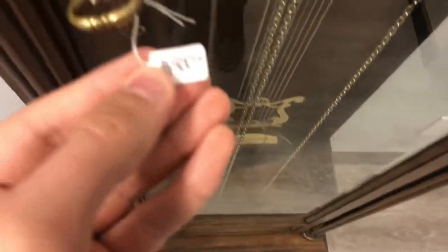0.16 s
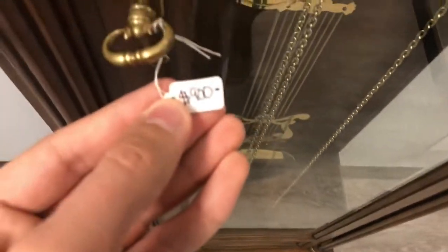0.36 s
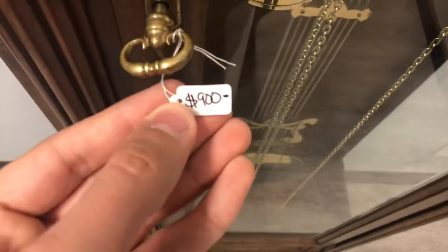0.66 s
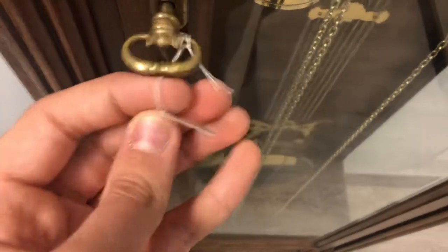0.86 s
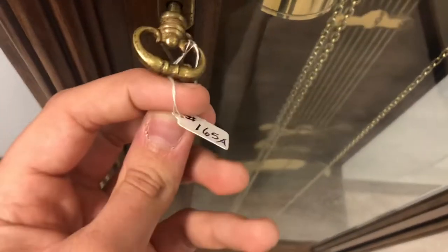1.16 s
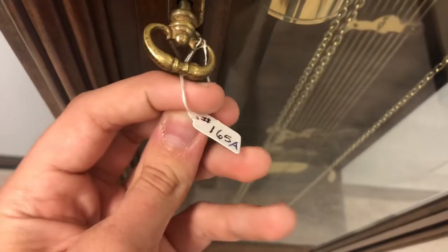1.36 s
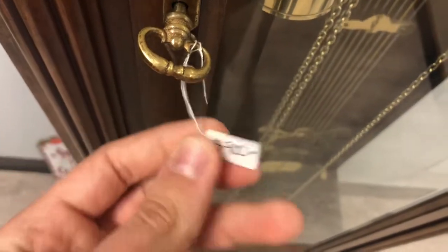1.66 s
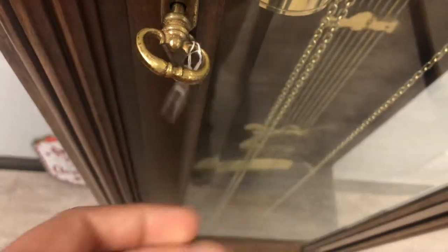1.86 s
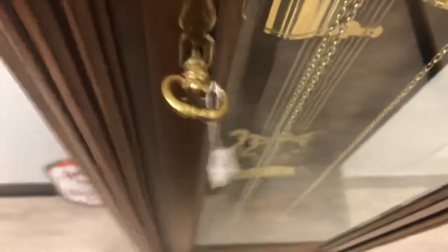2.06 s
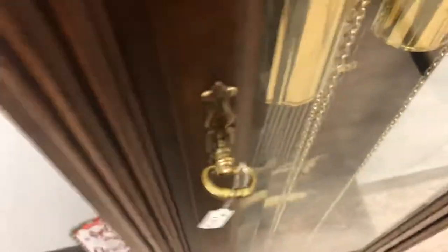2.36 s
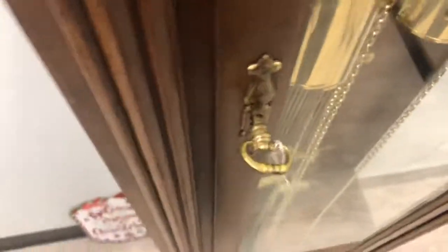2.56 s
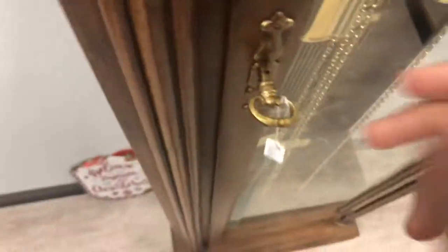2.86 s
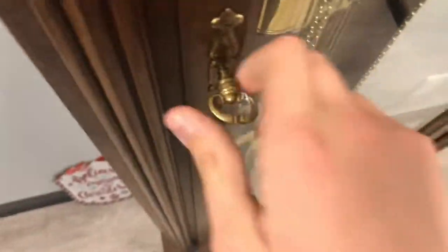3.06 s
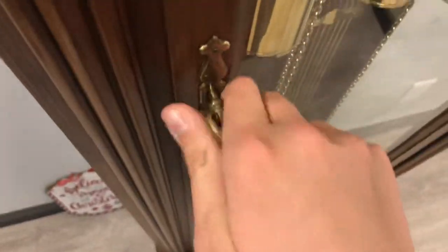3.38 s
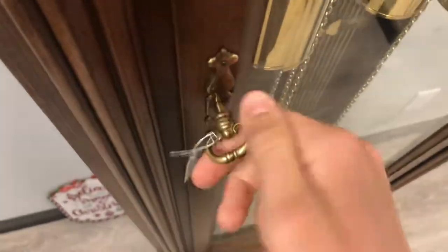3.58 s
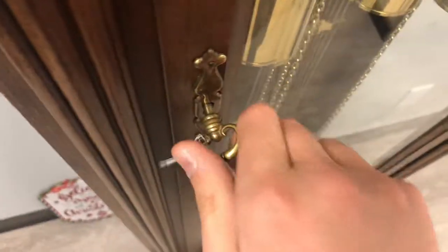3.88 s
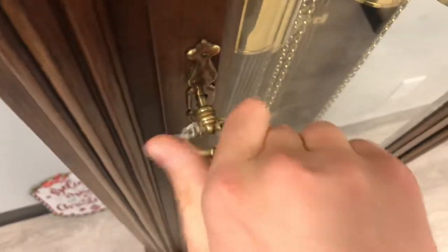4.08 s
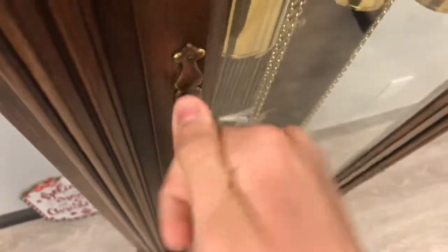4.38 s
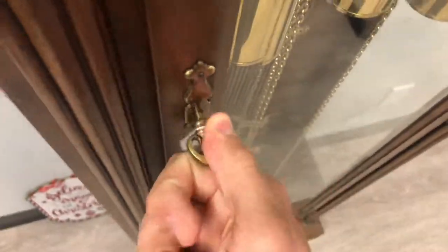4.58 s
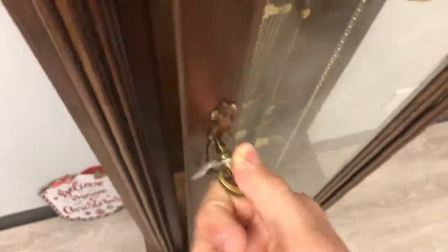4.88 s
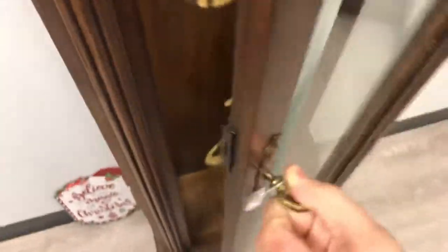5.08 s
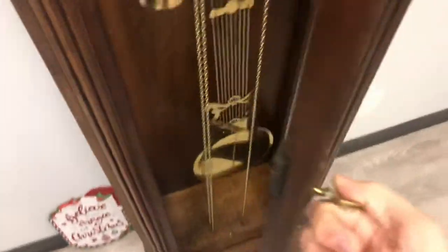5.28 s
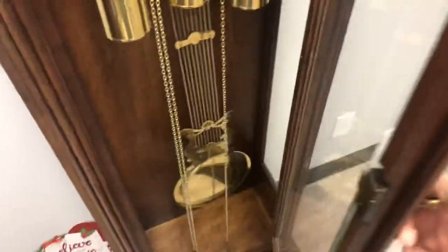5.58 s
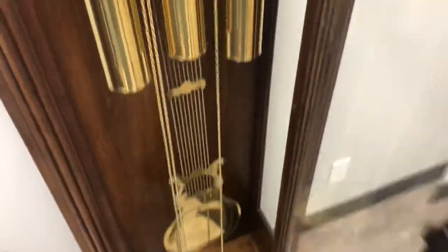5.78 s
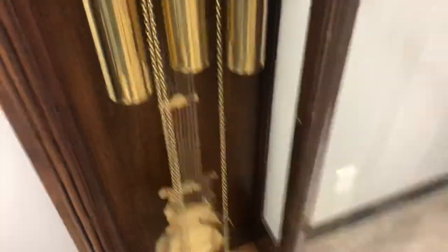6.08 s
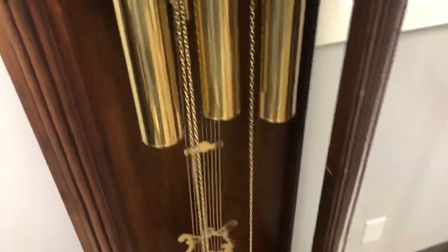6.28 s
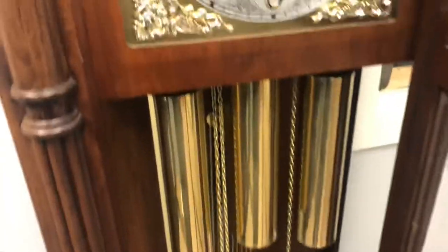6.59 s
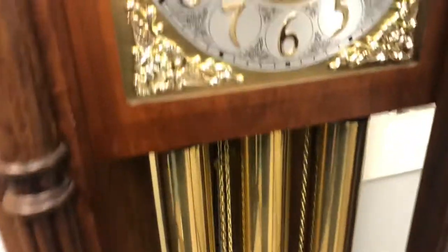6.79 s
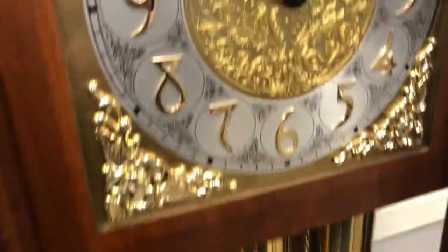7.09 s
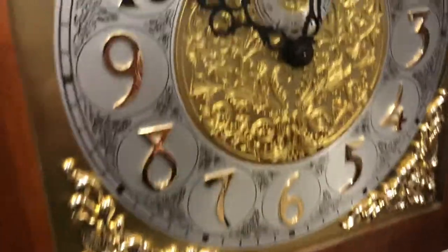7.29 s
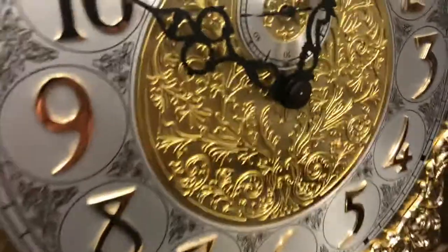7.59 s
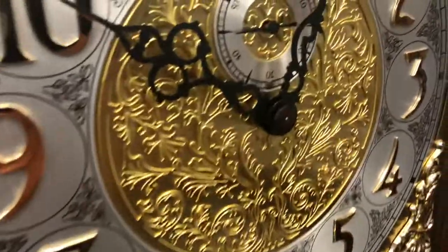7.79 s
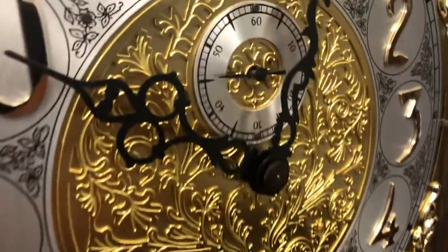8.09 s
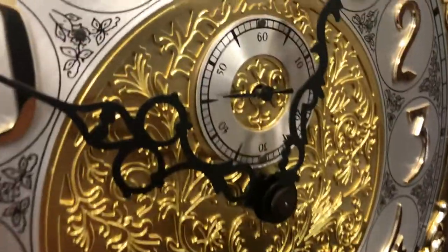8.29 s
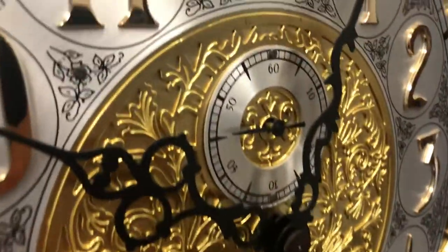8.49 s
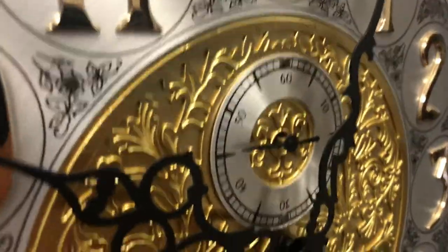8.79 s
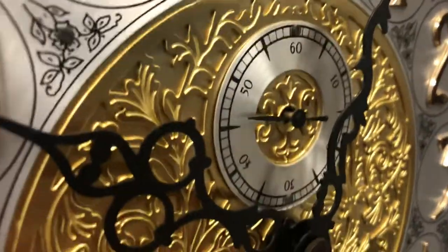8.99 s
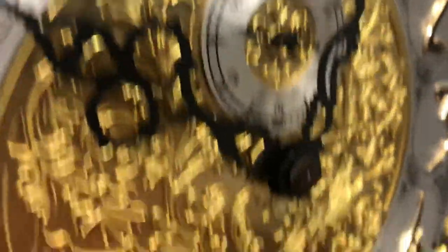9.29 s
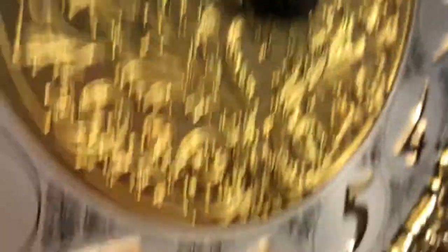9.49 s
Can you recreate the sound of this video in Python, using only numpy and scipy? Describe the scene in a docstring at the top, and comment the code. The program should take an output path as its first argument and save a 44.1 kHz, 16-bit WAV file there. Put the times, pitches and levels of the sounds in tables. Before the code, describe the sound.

Slow, slightly uneven tick-tock in a bare, mildly reverberant room with faint air noise. Near the microphone, fingers rub string and metal, and a brass handle chinks. Hard metallic rattles and woody knocks cluster as the latch is worked, then the glazed door swings with a soft whoosh of air and clothing. The listener moves up to the dial and the ticking becomes crisp.

```python
"""A tall pendulum clock ticks over a low ventilation drone in a bare room, while a hand lets go of
its tag, works the brass key and pulls the glazed door open. Noise bursts through resonances and
damped sine modes make the ticks, the lock's clacks, the thumps of the wooden case and the ring of
brass. Shaped noise makes air, rubbing fingers and shuffling feet, sines the hum, booms and swells;
decaying noise answers ticks, lock and brass as the room."""
import sys
import numpy as np
from scipy import signal
from scipy.fft import rfft, irfft, next_fast_len
from scipy.io import wavfile
from scipy.ndimage import map_coordinates

SR = 44100
rng = np.random.default_rng(int(sys.argv[2]) if len(sys.argv) > 2 else 0)


def to_wav(s):
    """Save 16-bit WAV."""
    ch = np.atleast_2d(s).T  # columns
    pcm = np.round(np.clip(ch, -1, 1) * 32767)  # PCM
    wavfile.write(sys.argv[1], SR, pcm.astype(np.int16))


N = 425565
T = np.arange(SR // 2) / SR  # time axis of one short event [s]
CLACK_HZ = 2790  # a middling clack


def amp(db):
    """Level definition: a gain of 10 to the power of dB / 20."""
    return 10 ** (np.asarray(db) / 20)


def unit(x):
    """Power normalisation: scale to rms 1."""
    return x / np.sqrt(np.mean(x ** 2) + 1e-20)


def blow(x):
    """Energy normalisation: scale to the energy of 10 ms at rms 1."""
    return x / np.sqrt(np.sum(x ** 2) / (SR / 100) + 1e-20)


def along(points, hz):
    """Interpolation of (frequency [Hz], value) points on a logarithmic frequency axis."""
    f, v = np.transpose(points)
    return np.interp(np.log(hz + 1), np.log(f + 1), v)


def level(rows):
    """Amplitude envelope: (time [s], level [dB]) rows as one gain per sample."""
    return amp(np.interp(np.arange(N) / SR, *np.transpose(rows)))


def wobble(rate, size=N):
    """Band-limited fluctuation: a smooth curve through random knots, rate knots a second."""
    knots = rng.standard_normal(int(size * rate / SR) + 4)
    return map_coordinates(knots, [np.arange(size) * rate / SR])


def filtered(x, response):
    """Linear filtering: the spectrum of x times a response of frequency."""
    m = next_fast_len(len(x) + 8192)
    spectrum = rfft(x, m) * response(np.fft.rfftfreq(m, 1 / SR))
    return irfft(spectrum, m)[:len(x)]


def coloured(x, points):
    """Minimum-phase filtering: a causal response with a (frequency [Hz], level [dB]) shape."""
    size = 2048
    cepstrum = irfft(np.log(amp(along(points, np.fft.rfftfreq(size, 1 / SR)))))
    # folding the cepstrum onto positive times makes the response causal
    cepstrum[1:size // 2] *= 2
    cepstrum[size // 2 + 1:] = 0
    impulse = irfft(np.exp(rfft(cepstrum)))
    return signal.fftconvolve(x, impulse)[:len(x)]


def resonate(x, peaks):
    """Parallel resonators, (centre [Hz], width [Hz], level [dB]), with alternating signs."""
    def response(f):
        total = 0
        for k, (centre, width, db) in enumerate(peaks):
            damping = 1j * f * width
            total = total + (-1) ** k * amp(db) * damping / (centre * centre - f * f + damping)
        return total
    return filtered(x, response)


def band(x, hz, width):
    """Band-pass filtering: a bell on the octave axis around hz, width in octaves."""
    return filtered(x, lambda f: np.exp(-2 * (np.log2((f + 1) / hz) / width) ** 2))


def noise(points):
    """Stationary Gaussian noise of rms 1 with a (frequency [Hz], level [dB]) spectrum."""
    return unit(filtered(rng.standard_normal(N), lambda hz: amp(along(points, hz))))


def burst(t60, after_db, after_t60, spike_db):
    """Impact excitation: a sharp push, a short crack, then chatter and near reflections."""
    spike = blow(1. * (T == 0))
    crack = blow(rng.standard_normal(len(T)) * amp(-60 * T / t60))
    chatter = blow(rng.standard_normal(len(T)) * amp(-60 * T / after_t60))
    return amp(spike_db) * spike + crack + amp(after_db) * chatter


def ring(modes):
    """Modal decay: a sum of damped sines, struck at slightly new strengths each time."""
    scatter_db = 2  # standard deviation of a mode's strength
    out = 0
    for hz, db, t60 in modes:
        decay = amp(db + scatter_db * rng.normal() - 60 * T / t60)
        out = out + decay * np.sin(2 * np.pi * (hz * T + rng.random()))
    return out


def loose_ring(modes):
    """Phase diffusion: loosely joined parts let each damped mode's phase wander and blur its line."""
    blur_hz = 45  # width given to each spectral line
    steps = rng.standard_normal((len(modes), len(T)))
    wander = np.cumsum(steps, axis=1) * np.sqrt(2 * np.pi * blur_hz / SR)
    out = 0
    for (hz, db, t60), phase in zip(modes, wander):
        out = out + amp(db - 60 * T / t60) * np.sin(2 * np.pi * (hz * T + rng.random()) + phase)
    return out


def struck(modes, favoured_hz, focus_db):
    """Strike-point selection: modes away from the favoured pitch lose focus_db per octave."""
    return blow(ring([(hz, db - focus_db * abs(np.log2(hz / favoured_hz)), t60) for hz, db, t60 in modes]))


def add(track, s, sound):
    """Superposition: mix a sound in at time s."""
    room_left = track[max(round(s * SR), 0):][:len(sound)]
    room_left += sound[:len(room_left)]


def ventilation():
    """Broadband flow noise under a frequency-modulated hum, a broad undertone and swelling low tones."""
    # spectrum of the air noise: (frequency [Hz], level [dB])
    air_shape = [(20, -25.5), (45, -9.5), (80, -14), (120, -8), (180, -8.5), (270, -7.5), (400, -8.5),
                 (620, -13.5), (1000, -14.5), (1500, -17), (2200, -24.5), (4000, -28.5), (7000, -31.5),
                 (11000, -33.5), (16000, -37.5)]
    # level of the narrow hum: (time [s], level [dB])
    hum_level = [(0, -88), (2.4, -73.5), (3.2, -67.5), (4.8, -60), (5.25, -76.5), (5.7, -58), (6.7, -69),
                 (7.8, -64), (8.75, -61.5), (9.1, -75)]
    # level of the broad undertone: (time [s], level [dB])
    undertone_level = [(0, -79.5), (2.9, -76.5), (4.75, -60), (5.25, -75.5), (5.75, -66), (7.0, -67.5),
                       (7.5, -74), (8.15, -75.5), (9.05, -66.5), (9.3, -76)]
    # low tones that come and go: (centre time [s], level [dB], length [s], pitch [Hz])
    swell_rows = [(6.925, -52, 0.061, 168), (7.548, -60, 0.29, 124), (7.967, -61.5, 0.15, 121.4),
                  (8.7, -61, 0.42, 148.4)]
    hum_hz = 175.3
    air_db, air_start_db, air_rise_s = -62.5, -3.5, 1  # the start is relative to air_db

    t = np.arange(N) / SR
    cycles = np.cumsum(hum_hz + 2.2 * wobble(12)) / SR
    hum = unit(np.sin(2 * np.pi * cycles) * amp(2.6 * wobble(15)))
    undertone = noise([(45, -37.5), (70, -5.0), (100, -14.5), (135, 2.5), (155, -3.5), (210, -44.0)])
    air = level([(0, air_db + air_start_db), (air_rise_s, air_db)]) * noise(air_shape)
    swells = np.zeros(N)
    for s, db, length, hz in swell_rows:
        envelope = amp(db + 0.98 * wobble(19)) * np.exp(-2 * ((t - s) / length) ** 2)
        swells += envelope * np.sin(2 * np.pi * np.cumsum(hz + 1.36 * wobble(7.6)) / SR)
    return air + level(hum_level) * hum + level(undertone_level) * undertone + swells


def thump():
    """Falling resonance: a soft, heavy contact sinks in pitch as it spreads."""
    # the contact: (time [s], level [dB], first pitch [Hz], last pitch [Hz], sinking time [s], t60 [s])
    s, db, first_hz, last_hz, sink_s, t60 = (2, -32.5, 148.5, 65, 0.2, 0.19)
    out = np.zeros(N)
    hz = last_hz + (first_hz - last_hz) * np.exp(-T / sink_s)
    add(out, s, amp(db - 60 * T / t60) * np.sin(2 * np.pi * np.cumsum(hz) / SR))
    return out


def handling():
    """Flow noise and damped resonance: door and clothes swish, the wood booms, feet and sleeve scuff."""
    # the door swinging wide and clothes moving with it: (time [s], level [dB])
    swing_level = [(5.45, -75), (5.65, -59.5), (5.85, -49), (6.05, -54.5), (6.28, -53), (6.45, -57),
                   (6.7, -62.5), (7.1, -94)]
    # spectrum of that swish: (frequency [Hz], level [dB])
    swish = [(50, -48.5), (100, -3.5), (170, -3.5), (260, 2), (430, -9.5), (680, -13), (1000, -15),
             (1500, -10.5), (2200, -15.5), (3000, -19.5), (5000, -26.5), (12000, -49)]
    # low booms of the wooden case and door under the knocks:
    # (time [s], level [dB], pitch [Hz], t60 [s])
    booms = [(0.904, -52, 129, 0.19), (2.639, -53, 68, 0.13), (3.244, -42, 187, .12),
             (3.376, -24.5, 282, 0.07), (3.853, -62, 70, 0.096), (3.852, -27, 197, 0.14),
             (4.13, -42, 98, 0.4), (4.15, -43.5, 82, .14), (4.463, -48, 57.4, 0.64),
             (4.463, -31, 250, 0.15)]
    # soft scuffs: (centre time [s], level [dB], length [s], pitch [Hz], width [octaves])
    scuffs = [(1.18, -53, 0.054, 260, 3.2), (2.115, -49.5, 0.0084, 423, 2.4), (2.164, -50, 0.018, 330, 1.2),
              (2.263, -44, 0.019, 450, 1.5), (2.316, -50, 0.2, 585, 1.85), (2.301, -50.5, 0.065, 890, 1),
              (2.632, -55, 0.12, 360, 2.2), (3.31, -42.5, 0.092, 161, 1.2), (3.318, -45, 0.087, 520, 2.1),
              (4.125, -40.5, 0.024, 450, 3.3), (6.498, -54, 0.035, 477, 1.6), (6.664, -55, 0.023, 600, 1),
              (6.959, -53.5, 0.12, 303, 1.3), (7.981, -51, 0.0076, 592, 0.67),
              (8.127, -52, 0.005, 480, 1.7), (8.448, -65, 0.47, 337, 1.35), (8.6, -70.5, 0.22, 1895, 0.86)]
    boom_rise_s = .004  # the heavy wood takes a moment to start moving

    out = level(swing_level) * noise(swish) * amp(wobble(40))
    for s, db, hz, t60 in booms:
        envelope = amp(db - 60 * T / t60) * (1 - np.exp(-T / boom_rise_s))
        add(out, s, envelope * np.sin(2 * np.pi * hz * T))
    for s, db, length, hz, width in scuffs:
        slips = rng.standard_normal(len(T)) * amp(3.2 * wobble(300, size=len(T)))
        grit = unit(band(slips, hz, width))
        add(out, s - T.mean(), amp(db) * grit * np.exp(-2 * ((T - T.mean()) / length) ** 2))
    return out


def fingers():
    """Stick-slip friction: skin and string rub in short grainy strokes, each with its own pitch."""
    # spectrum of rubbed skin: (frequency [Hz], level [dB])
    skin = [(1180, -37), (2000, -1), (2860, -3.5), (3680, -2.5), (5780, -6.5), (13600, -15.5), (16000, -25)]
    # strokes on tag, string and key:
    # (time [s], length [s], level at the end [dB], pitch [Hz], growth along the stroke [dB])
    strokes = [(1.107, 0.12, -63.5, 5140, -2.5), (2.137, 0.066, -57.5, 12700, -3),
               (2.228, 0.12, -64.5, 2900, -5.5), (2.332, 0.082, -55, 5200, 13),
               (2.268, 0.17, -55, 12500, 21), (2.658, 0.069, -64.5, 6300, 2), (3.159, 0.26, -65, 10500, 2),
               (3.455, 0.206, -71, 8000, 5), (4.693, 0.29, -69.5, 9000, 5), (5.28, 0.031, -60, 11100, 2),
               (5.357, 0.062, -56.5, 11000, 13), (5.39, 0.08, -62.5, 4500, 5), (5.69, 0.037, -57, 6500, 6),
               (6.383, 0.18, -70, 6050, 15), (6.753, 0.755, -75.5, 6070, 2), (8.153, 0.52, -79.5, 5340, 6),
               (9.216, 0.25, -76, 7370, 3)]
    rustle_db = -97  # faint bed that also fills the gaps between strokes
    ridges_per_s, grit_db = 900, 4  # the ridges of the skin make a stroke gritty
    catches_per_s, catch_db = 200, -14  # the skin catches and lets go
    tone_db, tone_octaves = -1, .7  # a stroke's own resonance over the plain rubbing
    attack_s, release_t60 = 0.011, 0.21

    out = amp(rustle_db + 0.67 * wobble(1.5)) * noise(skin)
    t = np.arange(SR) / SR
    for s, length, db, hz, growth_db in strokes:
        build_db = growth_db * np.clip(t / length - 1, -1, 0)
        release_db = -60 * np.maximum(t - length, 0) / release_t60
        slide = unit(rng.standard_normal(SR) * amp(grit_db * wobble(ridges_per_s, size=SR)))
        catches = unit(rng.standard_normal(SR) * (rng.random(SR) < catches_per_s / SR))
        rub = coloured(slide + amp(catch_db) * catches, skin)
        tone = band(rub, hz, tone_octaves)
        rub = unit(unit(rub) + amp(tone_db) * unit(tone))
        add(out, s, np.clip(t / attack_s, 0, 1) * amp(db + build_db + release_db) * rub)
    return out


def escapement():
    """Impact excitation of modes: the wheel drops on each pallet in turn and rings the movement."""
    # ring of the movement for each pallet: (frequency [Hz], level [dB], t60 [s])
    tick = [(2380, -7, 0.2), (2586, 0, 0.09), (2750, -2.5, 0.081), (2830, 0, 0.08), (2950, 0, 0.06),
            (3230, 0, 0.08), (3376, -3, 0.08), (3600, -6.5, .07), (3850, -7, .09), (5103, -15.5, .15)]
    tock = [(2380, -7, 0.17), (2596, 4, 0.081), (2676, 2, 0.07), (2790, -5, 0.08), (2900, 3, 0.07),
            (3130, 0.5, 0.076), (3340, -3, 0.055), (3590, -4, 0.098), (3890, -6, 0.12), (4560, -13, 0.12),
            (5400, -11, 0.1), (5470, -19, 0.13)]
    # ring of the back plate and of the steel parts: (frequency [Hz], level [dB], t60 [s])
    plate_modes = [(1710, -3, 0.12), (1760, 0, 0.1), (1832, -1, 0.14)]
    steel_modes = [(7900, 6, 0.027), (7850, -10, 0.046), (8260, -13, .06), (9100, 4, 0.058)]
    # the pallet's click, heard through the case: (frequency [Hz], level [dB])
    drop_shape = [(400, -25), (1000, -4.5), (1300, -14.5), (1750, -2.5), (2150, -6.5), (2700, -3),
                  (3400, -4), (5000, -11.5), (7000, -19), (11000, -29), (16000, -39)]
    # ticking as the door opens and the listener rises to the dial: (time [s], level [dB])
    nearness = [(0, -52.5), (1.04, -56), (3.039, -54.5), (4.198, -60), (5.001, -50.5), (6.1, -50),
                (7.001, -49.5), (8.099, -45.5), (9.099, -48)]
    # one full swing, and the tock's lag after each tick (slightly out of beat)
    first_tick_s, period_s, tock_lag_s = .1088, 1.9987, .9305
    tock_db = 4.5  # over the tick
    plate_db, steel_db = -2.5, -2.5  # plate within a tick, steel within a tock when nearest
    steel_grows = 3.7  # extra dB of steel per dB of nearness: it is heard only from near

    out = np.zeros(N)
    swell = 1 - np.exp(-T / 0.0023)
    times, near_db = np.transpose(nearness)
    for beat in np.arange(first_tick_s, N / SR, period_s):
        for s, pallet, pallet_db in ((beat, tick, 0), (beat + tock_lag_s, tock, tock_db)):
            db = np.interp(s, times, near_db)
            drop = blow(coloured(burst(t60=0.06, after_db=-5, after_t60=0.2, spike_db=-17), drop_shape))
            wheel = blow(loose_ring(pallet) * swell)
            plate = blow(loose_ring(plate_modes) * swell)
            click = amp(-2.5) * drop + wheel
            add(out, s, amp(db) * (amp(pallet_db) * click + amp(plate_db + pallet_db / 2) * plate))
            if pallet is tock:
                steel = blow(loose_ring(steel_modes) * swell)
                add(out, s, amp(db + steel_db + steel_grows * (db - near_db.max())) * steel)
    return out


def brass():
    """Free vibration: small metal parts ring on after some of the clacks."""
    # metal parts left ringing: (time [s], level [dB], part)
    chinks = [(.847, -34.5, "bow"), (0.891, -52, "bolt"), (3.240, -39.5, "bow"), (3.437, -33, "bolt"),
              (1.909, -57, "plate"), (5.574, -44, "key"), (5.967, -47.5, "hinge")]
    # modes of each part: (frequency [Hz], level [dB], t60 [s])
    bow = [(2010, -8.5, 0.1), (3630, -2.5, 0.084), (3940, -13, 0.065), (5640, -3, 0.031),
           (7320, -3.5, 0.098), (11200, 2.5, 0.019)]
    bolt = [(9150, -17, 0.11), (11600, -6, 0.12), (11970, -25, .14), (13020, -4, 0.12)]
    key = [(2470, -10, 0.18), (4500, -13, .05), (4660, -5, 0.12), (5640, -7, 0.12), (6670, 2, 0.051),
           (6850, 1.5, 0.037), (10600, -12, 0.12)]
    keyhole_plate = [(3085, -17, .15), (4960, 7, 0.054), (7270, -1.5, 0.098)]
    hinge = [(1750, 10, 0.062), (2870, -2, 0.14), (3340, 0, 0.25), (3530, 1, 0.043), (3980, -10, 0.1),
             (4080, 21, 0.016), (4240, -21, 0.25), (5346, -17, .3), (5850, -5, 0.27), (6900, 6, 0.12)]
    parts = {"bow": bow, "bolt": bolt, "key": key, "plate": keyhole_plate, "hinge": hinge}

    out = np.zeros(N)
    for s, db, part in chinks:
        add(out, s, amp(db) * ring(parts[part]))
    return out


def contact(case_db, door_db, door_hz, clack_db, clack_hz, ring_db, ring_hz, snap_db, t60):
    """Coupled resonators: a hard contact rings the lock's metal and shakes door and, more slowly, case."""
    # the wooden case: (centre [Hz], width [Hz], level [dB])
    case_peaks = [(95.4, 9.8, -1.5), (147, 20, -4.5), (203, 40, -2), (250, 22.03, -4.5), (277, 31, -3.5),
                  (445, 370, -9.5)]
    # modes of the lock's metal and of the door panel: (frequency [Hz], level [dB], t60 [s])
    lock_modes = [(2270, -4, 0.021), (2790, -1.5, 0.031), (3420, 3.5, 0.029), (3970, 4.5, .014),
                  (4030, 0.5, .02), (4500, 0, 0.022), (4880, -1, 0.018), (5640, 0.5, 0.024),
                  (6470, 4.5, 0.014), (6740, 5.5, 0.016), (7900, -5.5, 0.01), (10200, -2.5, 0.019),
                  (11200, -4.5, 0.014), (12600, 1.5, .014)]
    door_modes = [(387, -2, 0.17), (435, -0.5, 0.065), (520, 2.5, 0.053), (611.5, -3, 0.063),
                  (664, 3, 0.066), (780, 0.5, 0.054), (933, -1, .035), (1052, -0.5, 0.03), (1148, -1, 0.02),
                  (1360, 0, 0.05)]
    # hard contact in the lock, and its brightest edge: (frequency [Hz], level [dB])
    clack_shape = [(500, -40), (1200, -1.5), (2000, -4), (2800, -1), (4000, -1.5), (6000, -0.5),
                   (7200, -14), (9000, -26.5)]
    snap_shape = [(4000, -20.5), (7000, 9), (8600, 2.5), (10500, 4.5), (13000, -1), (16000, -13)]
    door_focus_db, lock_focus_db = 11, 10  # loss away from the favoured mode, per octave

    knock = burst(t60=0.0044, after_db=-2.0, after_t60=0.084, spike_db=-7.5)
    case = resonate(resonate(knock, case_peaks), [(178.8, 140, 0)])
    # the place of contact decides which modes of door and lock answer most
    push = resonate(burst(t60=0.016, after_db=-13.5, after_t60=0.067, spike_db=-2.5), [(door_hz, 1100, 0)])
    panel = struck(door_modes, door_hz, door_focus_db) * (1 - np.exp(-T / 0.00013))
    door = panel + blow(resonate(push, [(door_hz, 400, 0)]))
    rattle = burst(t60=0.016, after_db=-2.5, after_t60=0.068, spike_db=-4.5)
    chatter = resonate(rattle, [(ring_hz, 0.16 * ring_hz, 0)])
    metal = amp(-3) * (struck(lock_modes, ring_hz, lock_focus_db) + blow(chatter))
    # a brief contact is a clean click, a long one a rattle; small parts sound higher
    sharp_db = 20 * np.log10(0.013 / t60)
    shape = np.array(clack_shape) * [(clack_hz / CLACK_HZ) ** 0.071, 1]
    hit = burst(t60=t60, after_db=-4 - .5 * sharp_db, after_t60=0.064, spike_db=-2 + sharp_db)
    hard = coloured(hit, shape)
    clack = blow(hard) + amp(-4.0) * blow(resonate(hard, [(clack_hz, 700, 0)]))
    edge = burst(t60=t60, after_db=-22.0, after_t60=0.16, spike_db=-4.5 + sharp_db)
    snap = coloured(edge, snap_shape)
    wood = amp(case_db) * blow(case) + amp(door_db) * blow(door)
    return wood + amp(clack_db) * blow(clack) + amp(ring_db) * metal + amp(snap_db) * blow(snap)


def housing(x):
    """Resonant transmission: all that is struck in the lock sounds through its housing."""
    # resonances and the valleys between them: (centre [Hz], width [Hz], lift [dB])
    formants = [(1080, 160, 3), (1260, 81, -4), (2180, 240, 2.5), (2850, 97, 4.5), (3160, 260, -1),
                (3550, 200, -2), (4220, 170, -4.5), (4450, 201.2, 2.5), (4720, 230, -6), (5970, 370, -1),
                (7330, 300, -3), (9000, 500, -3)]
    hz = np.geomspace(20, SR / 2, 600)
    db = sum(lift_db / (1 + (2 * (hz - centre_hz) / width) ** 2) for centre_hz, width, lift_db in formants)
    return coloured(x, np.transpose([hz, db]))


def lock():
    """Impact and transmission: the bolt knocks door on frame; light clicks barely reach the wood."""
    # bolt and door knock on the frame, ahead of the housing:
    # (time [s], case [dB], door [dB], door pitch [Hz], clack [dB], clack pitch [Hz],
    #  lock ring [dB], lock ring pitch [Hz], snap [dB], contact t60 [s])
    knocks = [(0.8885, -45, -39.5, 1150, -29, 3170, -36.5, 5760, -33, 0.042),
              (.902, -42, -38.5, 664, -39.5, 2470, -79, 5640, -52.5, 0.021),
              (1.532, -66, -56.5, 980, -76, 2200, -63, 2270, -83, 0.0092),
              (2.198, -42.5, -43, 1200, -43, 1550, -64, 5640, -60, 0.0051),
              (2.643, -50.5, -53, 503, -61, 2000, -75.5, 3420, -65.5, 0.011),
              (3.2399, -44, -55, 410, -42.5, 5570, -54, 4880, -46.5, 0.049),
              (3.2574, -56, -43.5, 1300, -40.5, 3390, -50, 4030, -64, 0.036),
              (3.2667, -43, -46, 1360, -33.5, 1510, -42, 4530, -46, 0.02),
              (3.3707, -44, -42.5, 604, -42, 2400, -50, 2270, -48, 0.024),
              (3.3779, -38, -30, 780, -30.5, 2260, -35, 5400, -49.5, 0.022),
              (3.4375, -35, -40.5, 1099, -29.5, 2170, -31.5, 4400, -33, 0.022),
              (3.455, -43.5, -46.5, 927, -39.5, 2300, -48, 2790, -43, 0.046),
              (3.5474, -41.5, -37.5, 780, -42, 1510, -47, 4030, -56, 0.035),
              (3.561, -53, -48.5, 1360, -46.5, 2290, -45.5, 4030, -47.5, 0.038),
              (3.573, -49.5, -41.5, 1360, -38, 2280, -45, 10200, -52, .035),
              (3.8504, -36, -31, 640, -36.5, 2180, -64, 3420, -48.5, 0.018),
              (4.1128, -48.5, -45, 696, -46, 2350, -46, 2270, -60, 0.035),
              (4.1294, -33, -34, 535, -24.5, 3350, -27, 4880, -27.5, 0.015),
              (4.225, -41.5, -29.5, 1030, -31.5, 1170, -41, 5730, -43, 0.0095),
              (4.4618, -38, -32.5, 630, -29, 2580, -39, 5640, -33.5, 0.018),
              (4.471, -41, -36, 1150, -35.5, 2830, -37.5, 7900, -52, 0.019),
              (5.817, -48, -44, 846, -36.5, 1480, -43, 2350, -50, 0.036)]
    # light clicks of key, tag and hinge, ahead of the housing:
    # (time [s], clack [dB], ring [dB], pitch [Hz], contact t60 [s])
    clicks = [(0.8468, -40.5, -42, 4500, 0.081), (1.163, -55, -63, 4880, 0.19),
              (1.9087, -50, -60, 4880, 0.023), (2.0957, -57, -70, 3820, 0.0079),
              (2.441, -51.5, -53, 5640, 0.014), (3.895, -67, -62, 6740, 0.014),
              (4.215, -62, -59, 12600, .01), (4.294, -36, -44, 2240, 0.023),
              (4.298, -39, -36.5, 6400, 0.011), (4.322, -40.5, -52, 2270, 0.016),
              (4.331, -57, -59, 6500, .01), (4.4205, -33.5, -40, 6570, 0.015),
              (4.813, -66, -70, 11200, 0.015), (4.842, -68, -71, 11200, 0.011),
              (4.866, -68, -76, 11200, .01), (5.275, -69, -66.5, 10200, 0.0086),
              (5.298, -75, -69, 11200, .008), (5.321, -69, -67, 4030, .008), (5.421, -66, -54, 6480, 0.017),
              (5.447, -61, -62, 6360, 0.013), (5.475, -54, -69, 6200, 0.037),
              (5.576, -52.5, -48.5, 4700, 0.016), (5.663, -72, -57, 6650, 0.03),
              (5.771, -62, -67, 5640, .012), (5.7954, -48.5, -67, 4500, .015),
              (5.868, -82, -56, 2790, 0.054), (5.966, -33, -35.5, 3640, 0.045), (6.15, -72, -61, 2790, .04),
              (6.245, -73, -65, 1750, .03), (6.282, -63, -62, 2790, 0.053), (6.32, -69, -65, 3590, 0.034),
              (6.476, -65, -71, 4500, .012), (8.857, -74, -71, 5640, .01)]
    click_case_db, click_door_db, click_door_hz = -18.5, -16, 950  # share of a click in the wood
    edge_db, edge_db_per_octave = -6.5, 3  # a click's bright edge, stronger for smaller parts

    out = np.zeros(N)
    for s, *knock in knocks:
        add(out, s, contact(*knock))
    for s, db, ring_db, hz, t60 in clicks:
        snap_db = db + edge_db + edge_db_per_octave * np.log2(hz / CLACK_HZ)
        case_db, door_db = db + click_case_db, db + click_door_db
        add(out, s, contact(case_db, door_db, click_door_hz, db, hz, ring_db, hz, snap_db, t60))
    return housing(out)


def room(x):
    """Reverberant decay, drawn as fresh noise every third of a second; the highest treble dies first."""
    # reverberation time: (frequency [Hz], t60 [s])
    decay_times = [(100, 1), (300, 0.63), (1000, 0.51), (3500, 0.45), (7000, .42), (14000, 0.19)]
    # strength of the reverberation: (frequency [Hz], level [dB])
    send = [(100, -1), (300, 1), (1000, -6), (3500, -9.5), (7000, -15), (14000, -20)]

    out = np.zeros(N)
    step = SR // 3
    for start in range(0, N, step):
        hz, t, z = signal.stft(rng.standard_normal(SR * 3 // 4), SR, nperseg=256)
        t60 = along(decay_times, hz)[:, None]
        # the root evens out the energy of long and short decays
        fade = amp(along(send, hz)[:, None] - 60 * t / t60) * np.sqrt(2 * np.log(1000) / (t60 * SR))
        tail = signal.istft(z * fade * (1 - np.exp(-t / 0.0025)), SR, nperseg=256)[1]
        add(out, start / SR, signal.fftconvolve(x[start:start + step], tail))
    return out


def scene():
    """Superposition of direct and reverberant sound: the hand works close by, the case shields the ticks."""
    # echo of the ticking recedes as the listener comes up to the dial: (time [s], level [dB])
    tick_echo = [(7, 1), (8.1, -6), (9, -6.5)]
    ticks, clacks, chinks = escapement(), lock(), brass()
    front = room(clacks + amp(-7) * chinks + level(tick_echo) * ticks)
    # the sides of the case radiate each blow with a different fine colour, which evens out the echo
    sides = room(lock() + level(tick_echo) * escapement())
    echo = amp(-2.0) * (front + sides)
    return (ticks + clacks + chinks + echo + fingers() + handling() + thump() + ventilation())[None]


def record(dry):
    """Band limitation: the deepest bass is weakened and the sound ends near 16 kHz."""
    low_cut_hz, top_hz = 29, 16100
    low_cut = signal.butter(2, low_cut_hz, "high", fs=SR, output="sos")

    def top(hz):
        return np.clip((top_hz - hz) / 400 + .5, 0, 1)  # falls to nothing over 400 Hz
    return np.array([filtered(signal.sosfilt(low_cut, x), top) for x in dry])


dry = scene()
out = record(dry)
to_wav(out)
```